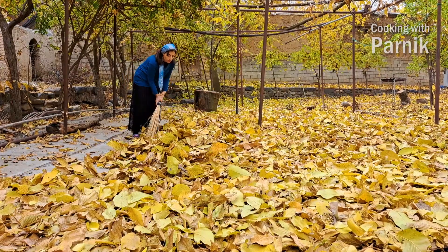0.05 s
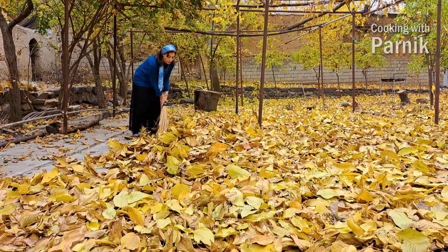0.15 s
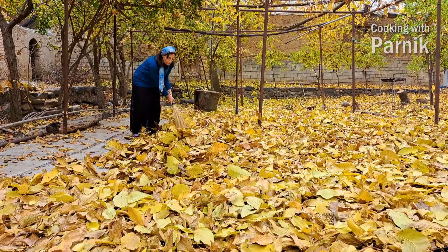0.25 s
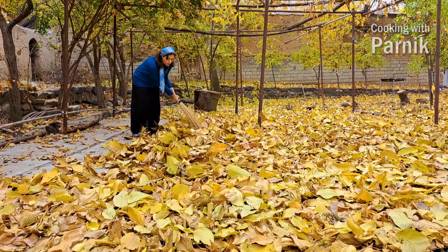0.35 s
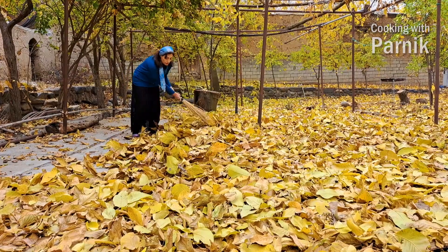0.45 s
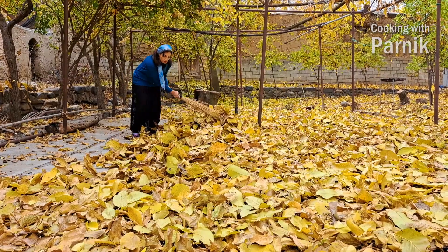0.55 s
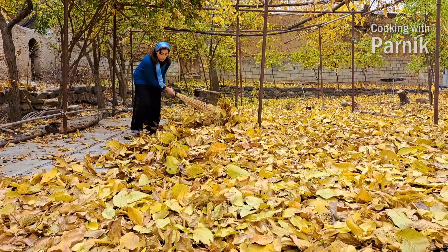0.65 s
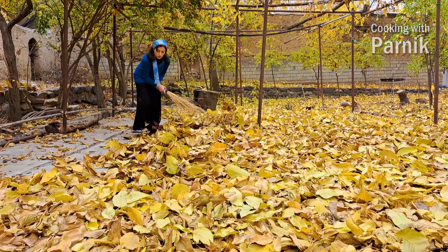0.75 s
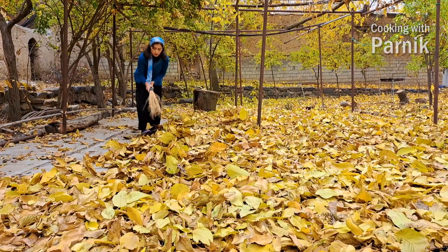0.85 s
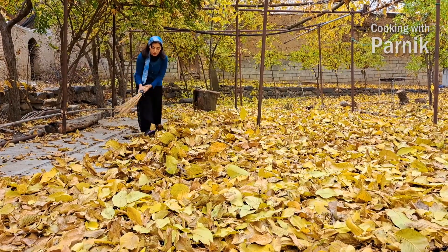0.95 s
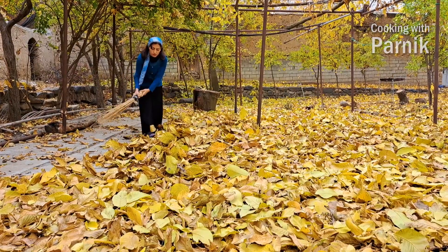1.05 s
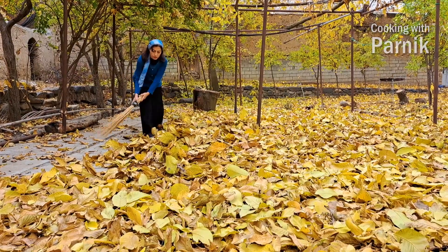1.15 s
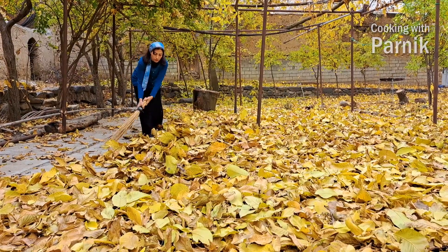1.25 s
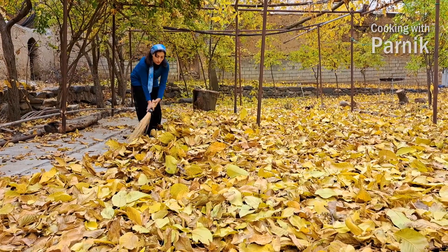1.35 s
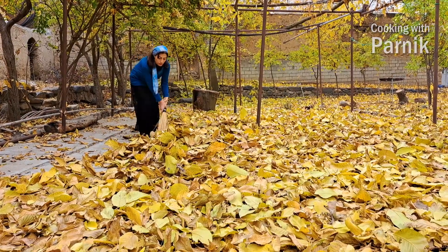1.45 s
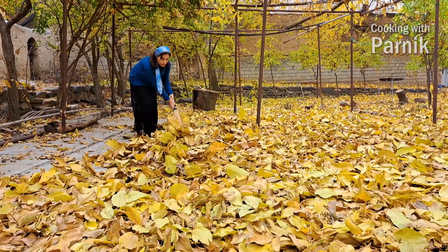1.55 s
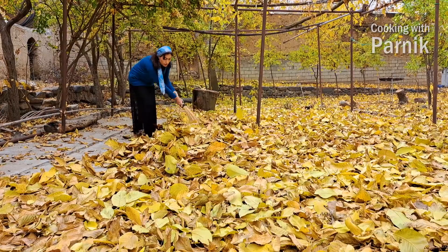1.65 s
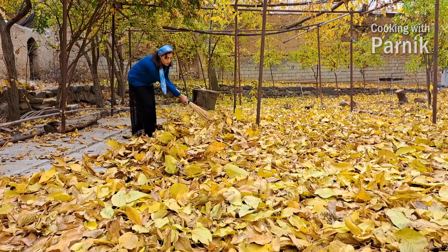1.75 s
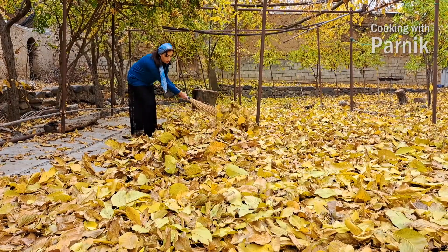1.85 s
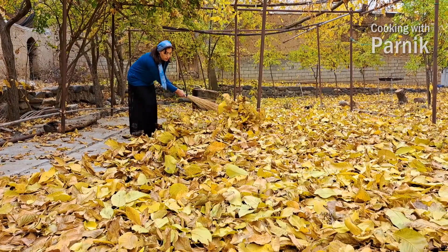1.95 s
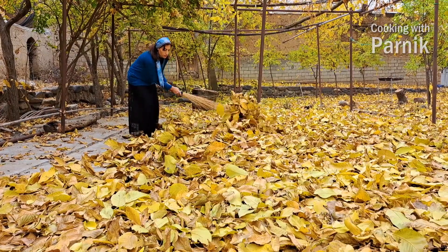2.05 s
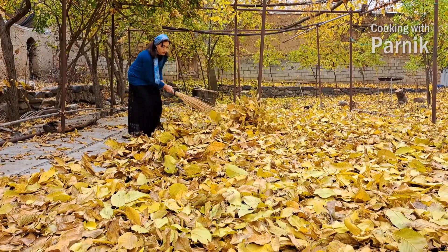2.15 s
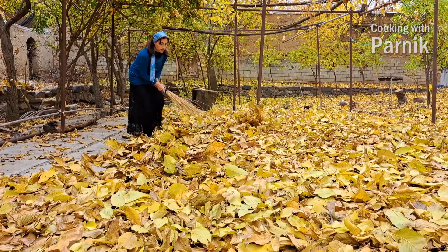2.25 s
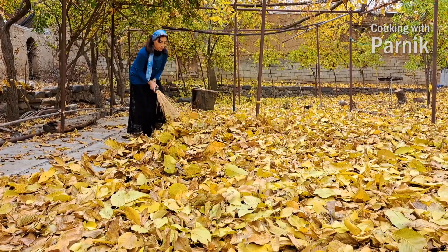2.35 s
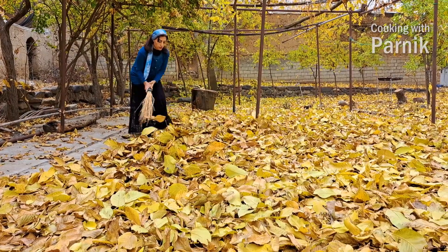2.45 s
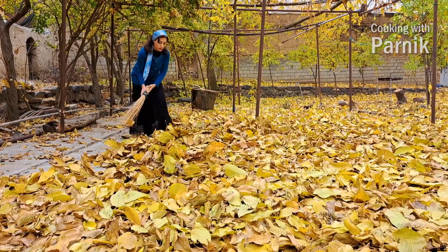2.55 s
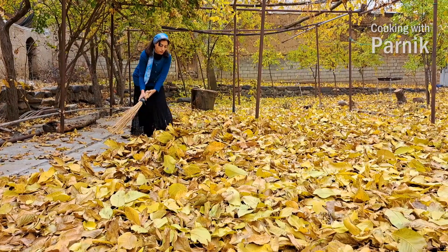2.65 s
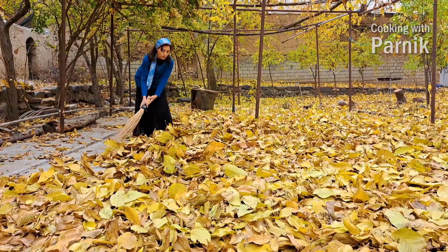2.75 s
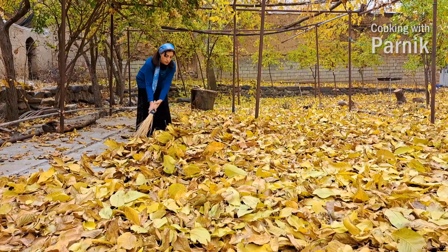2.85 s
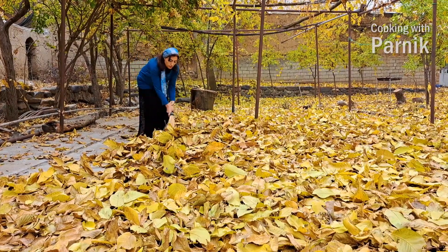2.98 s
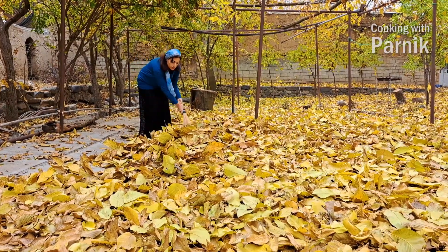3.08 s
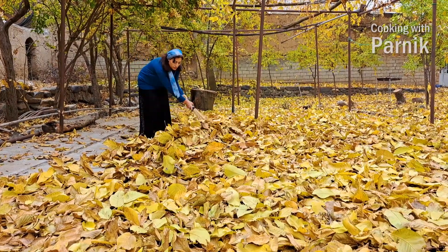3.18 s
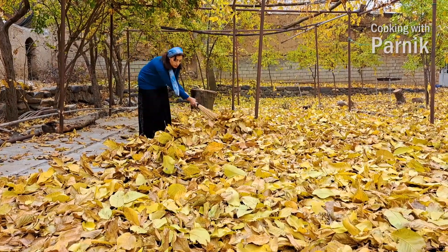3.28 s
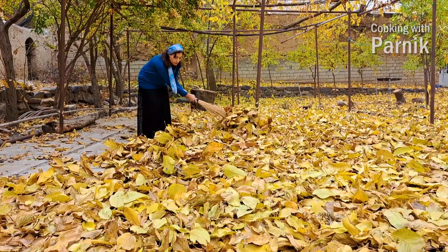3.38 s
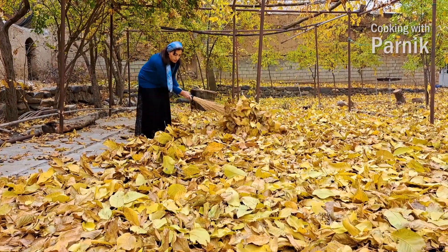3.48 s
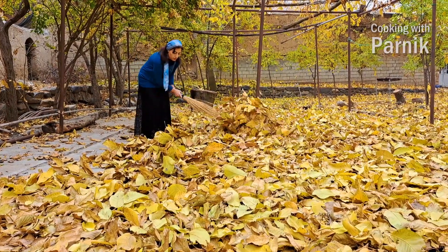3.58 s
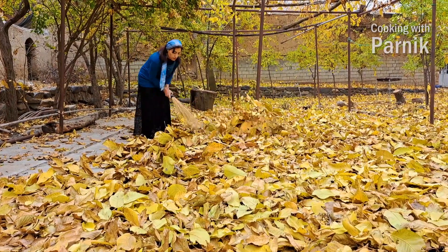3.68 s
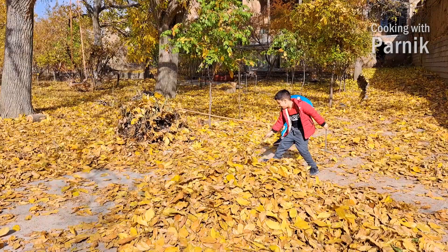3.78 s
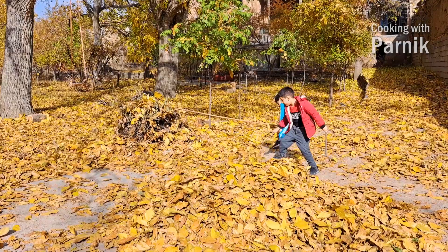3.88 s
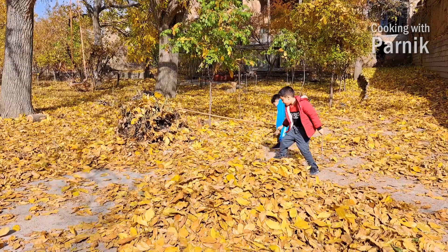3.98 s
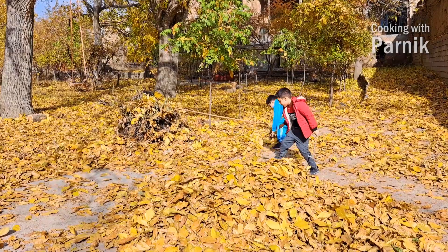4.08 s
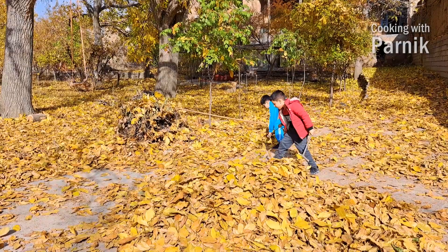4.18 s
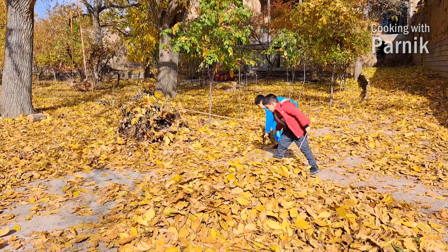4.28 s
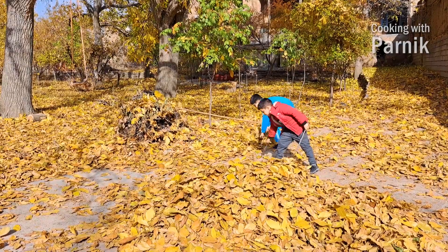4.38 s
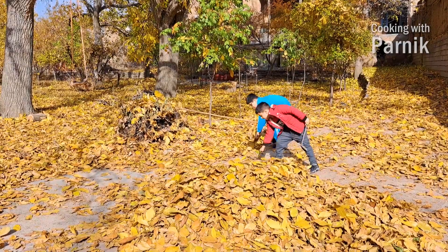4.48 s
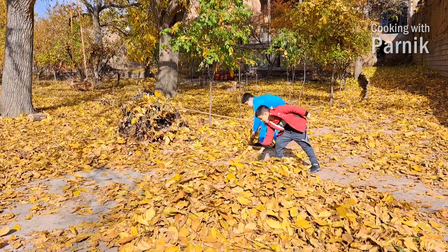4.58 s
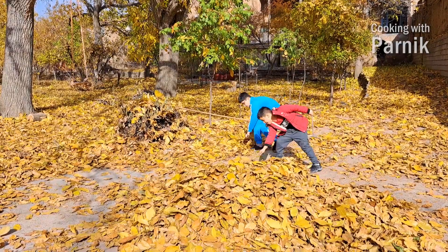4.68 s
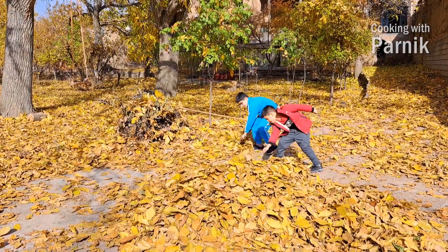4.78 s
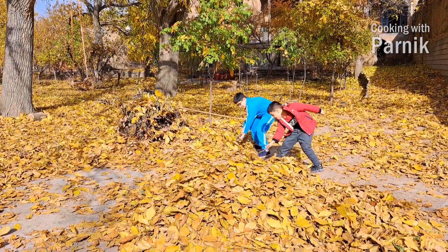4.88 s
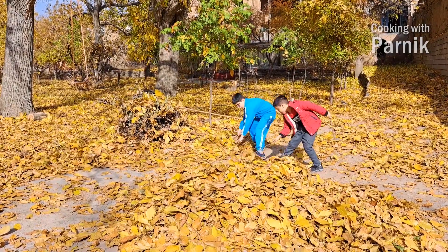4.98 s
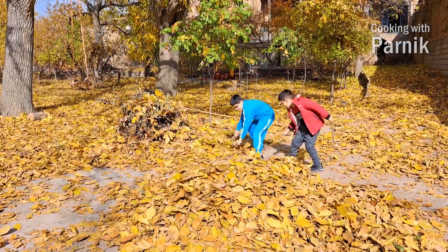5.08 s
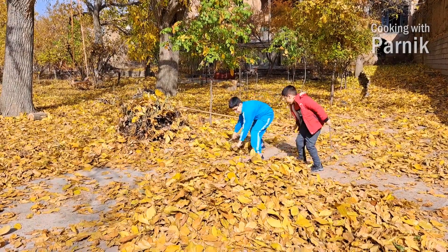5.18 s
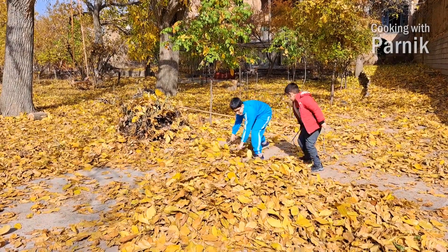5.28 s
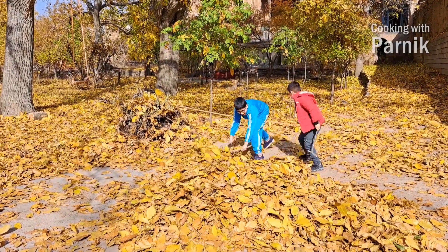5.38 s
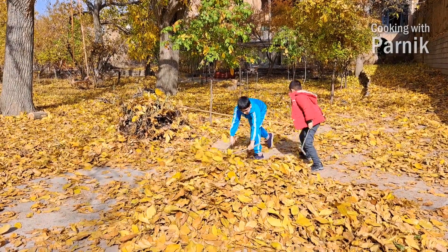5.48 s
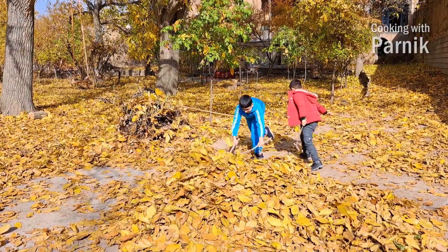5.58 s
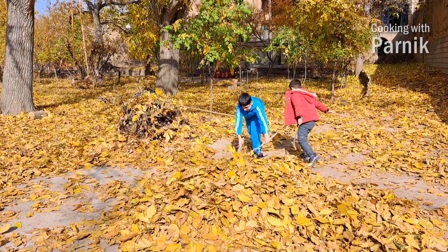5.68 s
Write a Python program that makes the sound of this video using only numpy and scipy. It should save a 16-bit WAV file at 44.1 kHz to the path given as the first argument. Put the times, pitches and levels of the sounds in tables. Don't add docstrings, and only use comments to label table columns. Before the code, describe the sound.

Dry leaves hiss and crackle under a stiff straw broom, stroke after stroke, with sharp bristle releases and single leaf snaps. The scene then switches to a quiet start of leaf gathering, a wooden-sounding knock, low footfalls and a thickening rustle. Open yard with close wall reflections, distant low traffic hum, light hiss, and a small two-port stereo microphone.

```python
import sys
import numpy as np
from scipy import signal
from scipy.fft import rfft, irfft, next_fast_len
from scipy.io import wavfile

SR = 44100
rng = np.random.default_rng(int(sys.argv[2]) if len(sys.argv) > 2 else 0)


def put_to_file(sound):
    columns = np.atleast_2d(sound).T
    safe = np.clip(columns, -1, 1)
    whole_steps = np.round(safe * 32767)
    wavfile.write(sys.argv[1], SR, whole_steps.astype(np.int16))


def natural_amplitude(level_db):
    exponent = np.asarray(level_db, float) / 20
    return 10 ** exponent


N = 252693
HZ = np.fft.rfftfreq(next_fast_len(N + SR // 4), 1 / SR)
SCENE_CHANGE_S = 3.837

# f/Hz, level/dB per Hz
TRAFFIC_SPECTRUM = [(13, -37), (22, -21), (60, 5), (76, 0.5), (129, -16), (146, -8.5), (221, -37),
                    (303, -21), (400, -36), (520, -18), (880, -120)]
# t/s, peak level/dB, half length/s
TRAFFIC_SWELLS = [(0.0, -49, 0.17), (0.35, -50.5, 0.13), (0.545, -41, .05), (0.683, -43, .04),
                  (0.79, -46, 0.085), (0.987, -53, 0.043), (1.25, -55.5, 0.23), (1.58, -43, 0.055),
                  (1.808, -52, 0.084), (2.56, -55, 0.054), (3.297, -51, 0.14), (3.653, -49.5, 0.11),
                  (4.0, -65, 0.044), (4.24, -63, .05), (4.39, -55, 0.044), (4.72, -41, 0.053),
                  (5.55, -60, .2)]
# t/s, peak level/dB, f/Hz, t60/s, overtone level/dB
KNOCKS = [
    (1.101, -50.5, 280, 0.021, 7),
    (2.742, -53.5, 387, 0.048, 7.5),
    (3.804, -28, 338, 0.039, -7),
    (4.358, -18.5, 421, 0.035, -21),
    (4.65, -30, 190, 0.07, -4),
    (4.697, -38, 142, 0.04, -7),
    (4.729, -27.5, 164, 0.094, -6),
]
# t/s, peak level/dB, f/Hz
TWIG_TICK = (2.7412, -34.5, 1150)
# f/Hz, level/dB per Hz
GROUND_SPECTRUM = [(70, -47), (110, -9.5), (150, -5.5), (240, -1), (320, -7.5), (450, -8)]
# f/Hz, level/dB per Hz
HEAP_SPECTRA = [
    [(250, -11), (330, -1.5), (430, -5), (520, 0), (620, -5.5), (800, -8.5), (1000, -8.5), (1500, -7),
     (2200, -10.5)],
    [(300, -8.5), (500, -13.5), (640, -6), (810, -4), (950, -5.5), (1150, -7), (1420, -10.5), (1650, -11.5),
     (2200, -22)],
]
# f/Hz, level/dB per Hz
LEAF_SPECTRUM = [(600, -8), (1100, -9.5), (1500, -2.5), (2000, -2.5), (3000, -4.5), (5000, -9.5),
                 (8000, -16), (16000, -19.5)]
# t/s, peak level/dB, f/Hz
LEAF_CRACKS = [(0.677, -15, 3840), (0.6894, -21, 3900), (0.8335, -27, 4790), (0.9194, -25, 4600),
               (1.0095, -25, 4650), (2.2694, -20, 4510), (2.387, -15, 4160), (2.453, -22, 4610),
               (3.1594, -19, 1590), (3.8087, -13, 4680), (4.6894, -6, 3770), (4.7486, -19, 4090)]
# t/s, peak level/dB
BRISTLE_CATCHES = [
    (0.1047, -13),
    (0.2154, -13),
    (1.3104, -16),
    (1.4022, -8),
    (1.447, 2.5),
    (1.4974, -4),
    (2.8789, -22),
    (2.9574, -20),
    (3.8087, -15),
    (4.6494, -19),
]
# f/Hz, level/dB per Hz
TUFT_SPECTRUM = [(2500, -20), (4000, 2), (5500, 17), (8000, -16), (12000, -1), (16000, -16)]
# f/Hz, level/dB per Hz
STRAW_SPECTRUM = [(1500, -16), (3000, -5.5), (5000, 0), (8000, -2.5), (12000, 4.5), (16000, -1.5)]
# t/s, tip speed level/dB, leaf load level/dB
BROOM_STROKES = [
    [(0.0, -43, -41), (0.072, -46, -58)],
    [(0.126, -38.5, -55), (0.2, -34, -60), (0.272, -22, -29), (0.5, -33.5, -31.5), (0.66, -34, -40),
     (0.772, -45, -48.5), (1.0, -45.5, -53.5), (1.17, -52.5, -59.5), (1.3, -49, -69.5)],
    [(1.328, -39, -63.5), (1.464, -20, -41.5), (1.516, -20, -29.5), (1.68, -29.5, -27), (1.8, -27.5, -25),
     (2.08, -39.5, -45), (2.514, -42, -46.5), (2.698, -54, -61), (2.872, -55, -67)],
    [(2.898, -37, -66), (2.994, -25.5, -33), (3.104, -32, -27.5), (3.18, -28, -23), (3.32, -29.5, -25),
     (3.524, -32, -34), (3.69, -32, -38), (3.758, -38.5, -42.5), (3.83, -34, -39)],
]
# t/s, speed level/dB, leaf load level/dB
GATHERING = [
    (3.84, -64, -46.5),
    (3.908, -42, -53.5),
    (4.05, -41, -39.5),
    (4.58, -35, -34),
    (4.766, -34.5, -30.5),
    (5.0, -34, -29.5),
    (5.328, -30, -27),
    (5.556, -29, -26.5),
    (5.73, -35.5, -29.5),
]
# t/s, half length/s, level/dB
CLUSTER_SURGES = [(0.685, 0.019, 1.5), (0.735, 0.034, -2), (2.585, 0.04, -2), (3.813, 0.017, -0.5),
                  (3.97, 0.04, -0.5), (0.918, 0.031, 2.5), (1.226, 0.021, 2.5), (1.331, 0.017, 3.5),
                  (1.753, 0.03, 0.5), (1.996, 0.041, 4), (2.147, 0.043, 4), (2.472, 0.035, 2),
                  (2.81, 0.039, 0), (4.669, 0.049, 5), (5.07, 0.04, 1), (5.343, 0.072, 2.5)]
DRYNESS_DB = [-0.5, 0.5, 0.9, 2, 2.5]
BARE_GROUND_DB = [-17, -12, -11.5, -11.5, -8.5]
# f/Hz, width/Hz, level/dB
NEW_DIRECTION = [
    [(1350, 99, 2.5), (1180, 90, 0.5), (2200, 780, 0.5), (5900, 830, 1.5), (9100, 900, -1.5)],
    [(1420, 99, 3), (1210, 97, -3), (2620, 760, -0.5), (5320, 160, 2.5), (6000, 390, 0), (9800, 510, -0.5)],
]
# f/Hz, width/Hz, level/dB
LEFT_CAVITY = [(1100, 500, -4), (4560, 1900, -3), (6200, 780, -3.5), (7400, 780, 7.5), (9700, 720, 2),
               (13300, 1140, 3)]
# f/Hz, width/Hz, level/dB
RIGHT_CAVITY = [(1170, 1240, -2.5), (3320, 270, 2), (4516, 1140, 13), (6070, 330, -0.5), (7880, 905, 11),
                (9570, 1200, -6.5), (12530, 1700, 6)]


def evened(x):
    return x / np.sqrt(np.mean(x ** 2) + 1e-20)


def colour(x, gain_db):
    size = 2 * (len(HZ) - 1)
    return irfft(rfft(x, size) * natural_amplitude(gain_db), size)[..., :N]


def read(points):
    f, db = np.transpose(points)
    f = np.r_[f[0] / 2, f, f[-1] * 2]
    db = np.r_[db[0] - 30, db, db[-1] - 30]
    return np.interp(np.log(HZ + 1), np.log(f), db)


def bumps(modes):
    return sum(db / (1 + ((HZ - hz) / width_hz) ** 2) for hz, width_hz, db in modes)


def flutter(top_hz):
    t = np.arange(0, N, 64) / SR
    rates_hz = np.geomspace(6, top_hz, num=30)
    waves = sum(np.sin(2 * np.pi * (f * t + rng.random())) / np.sqrt(f) for f in rates_hz)
    return np.interp(np.arange(N) / SR, t, evened(waves))


def movement_gain(layer):
    surge_share_straw, surge_share_heap = 0.88, 0.29
    scuff_by_load, crackle_by_load, crackle_by_speed = 0.85, 0.45, 0.47
    usual_db, flick_db = -33, -32.5
    tables = [*BROOM_STROKES, GATHERING]
    t = np.arange(N) / SR
    rows = np.concatenate(tables)
    which = np.repeat(np.arange(len(tables)), [len(table) for table in tables])
    s, speed_db, load_db = rows.T
    cut = len(rows) - len(GATHERING)

    def joined(v):
        broom = np.interp(t, s[:cut], v[:cut])
        hands = np.interp(t, s[cut:], v[cut:])
        return np.where(t < SCENE_CHANGE_S, broom, hands)

    surge_db = sum(db * np.exp(-((t - at) / half_s) ** 2) for at, half_s, db in CLUSTER_SURGES)
    if layer == "straw":
        return natural_amplitude(joined(speed_db) + surge_share_straw * surge_db)
    if layer == "heap":
        return natural_amplitude(joined(load_db) + surge_share_heap * surge_db)
    extra_db = usual_db + surge_db
    above_usual_db = load_db - usual_db
    if layer == "ground":
        return natural_amplitude(extra_db + joined(np.array(BARE_GROUND_DB)[which] + scuff_by_load * above_usual_db))
    pushed_db = crackle_by_speed * (np.minimum(joined(speed_db), flick_db) - usual_db)
    loaded_db = joined(np.array(DRYNESS_DB)[which] + crackle_by_load * above_usual_db)
    return natural_amplitude(extra_db + pushed_db + loaded_db)


def snaps(spectrum, count, spread_db, ring_ms, lag_ms, width_ms, side_db, kinds=10):
    when, big, place, sign, dither = rng.random((count, 5)).T
    height = np.sign(sign - 0.5) * natural_amplitude(spread_db * np.minimum(-np.log(big + 1e-9), 4.5))
    place = np.sqrt(11) * (2 * place - 1) ** 5
    lag = (lag_ms + width_ms * place) * SR / 1000 + dither
    at = np.floor(when * (N - 200)) + 100 + np.outer([0, 1], lag)
    length = 2 * (len(HZ) - 1)
    t = np.arange(2048) / SR
    rattles = rfft(rng.standard_normal((kinds, len(t))) * np.exp(-t * 1000 / ring_ms), length)
    rattles = rattles / np.sqrt((abs(rattles) ** 2).mean(0)) * natural_amplitude(read(spectrum))
    out = np.zeros((2, len(HZ)), complex)
    for port in range(2):
        sided = height * natural_amplitude(side_db * (port - 1.0) * place)
        for k in range(kinds):
            clicks = np.bincount(at[port, k::kinds].astype(int), sided[k::kinds], length)
            out[port] += rattles[k] * rfft(clicks, length)
    return evened(irfft(out, length)[:, :N])


def passing():
    t = np.arange(N) / SR
    swells = sum(natural_amplitude(db) * np.exp(-((t - s) / half_s) ** 2) for s, db, half_s in TRAFFIC_SWELLS)
    return natural_amplitude(-63.5) + swells


def traffic():
    a, b = rng.standard_normal((2, N))
    rumble = evened(colour(np.array([a + 0.17 * b, a - 0.2 * b]), read(TRAFFIC_SPECTRUM)))
    note = np.sin(2 * np.pi * np.cumsum(61 + 5 * flutter(9.7)) / SR)
    balance = natural_amplitude(np.array([[-0.6], [0.6]]))
    return (0.89 * rumble + 0.1 * note) * balance * passing()


def knocks():
    out, t = np.zeros(N), np.arange(6000) / SR
    for s, db, hz, t60_s, over_db in KNOCKS:
        thump = natural_amplitude(-60 * t / t60_s) * np.sin(2 * np.pi * hz * t)
        overtones = np.sin(2 * np.pi * 1.3 * hz * t) + np.sin(2 * np.pi * 1.8 * hz * t)
        thump += natural_amplitude(over_db - 90 * t / t60_s) * overtones
        out[round(s * SR):][:len(t)] += natural_amplitude(db) * thump
    near_wall = 0.17 * np.roll(out, round(0.00375 * SR))
    far_wall = 0.75 * np.roll(out, round(0.01287 * SR))
    return signal.lfilter(*signal.butter(2, 110, "high", fs=SR), out + near_wall + far_wall)


def tick():
    s, db, hz = TWIG_TICK
    t = np.arange(N) / SR - s
    snap = -np.cos(2 * np.pi * hz * t) * np.exp(-(t * hz * 1.4) ** 2)
    ring = 0.12 * np.sin(2 * np.pi * 1700 * t) * np.exp(-abs(t) / 0.014) * (t > 0)
    bounce = 0.48 * np.roll(snap, round(0.011 * SR))
    return natural_amplitude(db) * (snap + ring + bounce)


def ground():
    scuff = snaps(GROUND_SPECTRUM, count=6000, spread_db=2.0, ring_ms=5.9, lag_ms=0.18, width_ms=0.11,
                  side_db=1.0, kinds=5)
    return scuff * movement_gain("ground") * natural_amplitude(0.7)


def heap():
    swept, gathered = (snaps(spectrum, count=24000, spread_db=3.0, ring_ms=4.05, lag_ms=0.072,
                             width_ms=0.16, side_db=1.6, kinds=5) for spectrum in HEAP_SPECTRA)
    bed = np.where(np.arange(N) / SR < SCENE_CHANGE_S, swept, gathered)
    return bed * movement_gain("heap") * natural_amplitude(-0.03 + 1.4 * flutter(30.0))


def cracks():
    crack_ms, crack_db, stray_db = 0.4, -7, -14
    out, t = np.zeros(N), np.arange(400) / SR
    x = t * 2000 / crack_ms
    pulse = np.e * x * np.exp(-x)
    for (s, db, hz), grit in zip(LEAF_CRACKS, rng.random(len(LEAF_CRACKS))):
        ring = np.sin(2 * np.pi * hz * t) + 0.39 * np.sin(2 * np.pi * hz * (1.12 + grit) * t)
        out[round(s * SR):][:len(t)] += natural_amplitude(db + crack_db) * ring * pulse
    stray = snaps(LEAF_SPECTRUM, count=500, spread_db=3.5, ring_ms=0.53, lag_ms=0.081, width_ms=0.1,
                  side_db=4.0, kinds=8)
    balance = natural_amplitude(np.array([[-1.5], [-2.5]]))
    return out * balance + stray * movement_gain("leaves") * natural_amplitude(stray_db)


def leaves():
    crackle = snaps(LEAF_SPECTRUM, count=30000, spread_db=-0.5, ring_ms=1.52, lag_ms=0.066, width_ms=0.16,
                    side_db=-4.0, kinds=8)
    curled = snaps(LEAF_SPECTRUM, count=2500, spread_db=1.5, ring_ms=3.0, lag_ms=0.068, width_ms=0.12,
                   side_db=6.0, kinds=8)
    return (crackle + 0.51 * curled) * movement_gain("leaves") * natural_amplitude(0.16 + 0.34 * flutter(40.0))


def catches():
    swell, t = np.zeros(N), np.arange(1500) / SR
    for s, db in BRISTLE_CATCHES:
        swell[round(s * SR):][:len(t)] += natural_amplitude(db - 18 - 60 * t / 0.06) * (1 - np.exp(-t / 0.002))
    burst = snaps(TUFT_SPECTRUM, count=60000, spread_db=3.5, ring_ms=0.31, lag_ms=0.046, width_ms=0.091,
                  side_db=-0.5, kinds=3)
    return swell * burst


def straw():
    hiss = snaps(STRAW_SPECTRUM, count=60000, spread_db=0.0, ring_ms=0.66, lag_ms=0.02, width_ms=0.21,
                 side_db=-3.5)
    return hiss * movement_gain("straw") * natural_amplitude(1.0 + 0.63 * flutter(60.0))


def scene():
    near = knocks() + tick() + ground() + heap() + cracks() + leaves() + catches() + straw()
    echo_ms, echo_share = 1.34, np.array([[0.07], [0.14]])
    echo = 1 + echo_share * np.exp(-2j * np.pi * HZ * echo_ms / 1000)
    shading_db = np.array([bumps(side) for side in NEW_DIRECTION])
    balance_db = np.array([[-0.8], [0.3]])
    later = colour(near, 20 * np.log10(abs(echo)) + shading_db + balance_db)
    return np.where(np.arange(N) / SR < SCENE_CHANGE_S, near, later) + traffic()


def top_cut(x):
    return signal.sosfilt(signal.butter(12, 16060, fs=SR, output="sos"), x)


def record(dry):
    right_db, self_noise_db, edge_hz = 1, -66, 15750
    cavities_db = np.array([bumps(LEFT_CAVITY) - right_db / 2, bumps(RIGHT_CAVITY) + right_db / 2])
    heard = colour(dry, cavities_db)
    heard = heard + natural_amplitude(self_noise_db) * rng.standard_normal(dry.shape)
    heard = 0.8 * np.tanh(heard / 0.8)
    heard = colour(heard, -70 * np.clip((HZ - edge_hz) / 150, 0, 1) ** 2)
    return top_cut(heard)


dry = scene()
out = record(dry)
put_to_file(out)
```